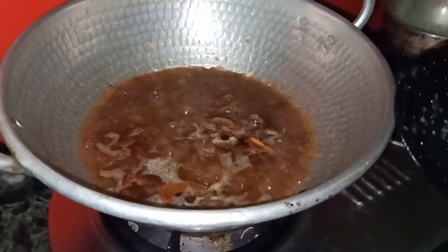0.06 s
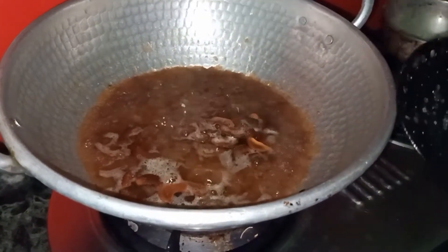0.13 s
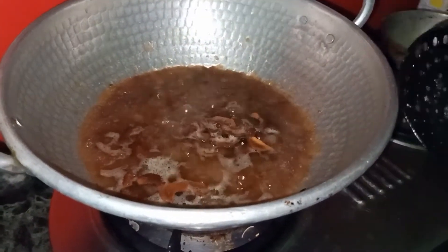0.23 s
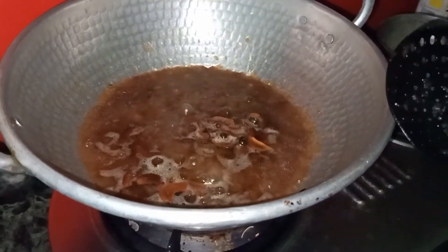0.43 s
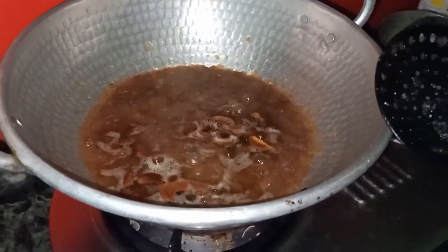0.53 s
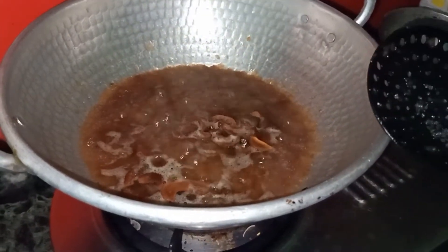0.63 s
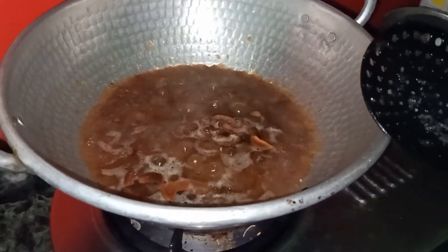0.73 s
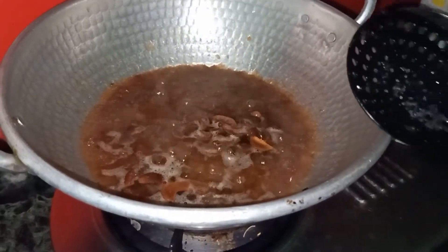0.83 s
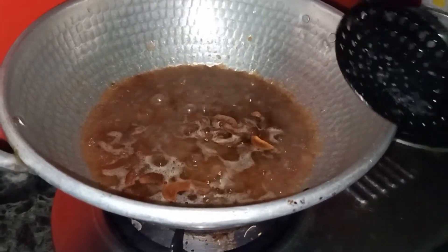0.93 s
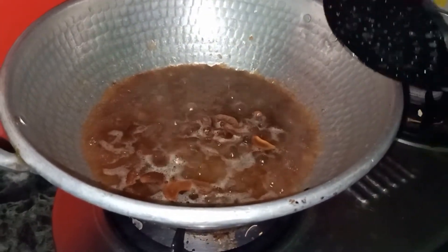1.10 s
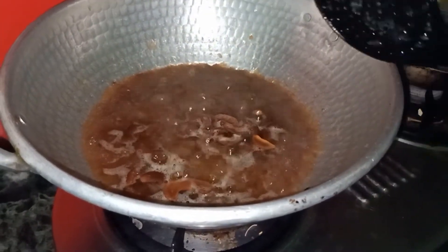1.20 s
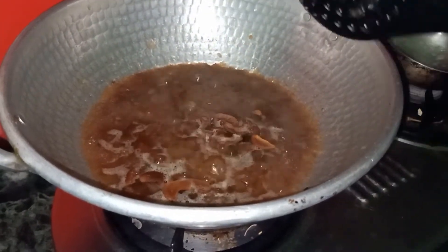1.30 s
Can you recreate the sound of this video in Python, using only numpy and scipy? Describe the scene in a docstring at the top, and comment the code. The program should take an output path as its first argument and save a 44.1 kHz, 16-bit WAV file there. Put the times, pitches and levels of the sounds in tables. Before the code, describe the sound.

A hard, clattering utensil knock rings a metal pan early on, followed by a softer muffled bump, while thick syrup sizzles and pops over a faint gas flame; close stereo microphone in a small kitchen.

```python
"""Thick syrup simmers in a metal pan on a gas ring in a small kitchen.
Its bubbles are swelling tones that start with a snap; thousands of tiny ringing bursts make the sizzle.
The flame is coloured noise. A utensil knocks the pan once, hard and clattering, and a soft bump follows:
filtered noise clanks over the ringing modes of the pan.
The two microphone ports each have a resonance of their own."""
import sys
import numpy as np
from scipy import signal
from scipy.fft import rfft, irfft
from scipy.io import wavfile

SR = 44100
rng = np.random.default_rng(int(sys.argv[2]) if len(sys.argv) > 2 else 0)


def put_to_file(sound):
    """Save the sound as 16-bit audio at rate SR, in the file named by the first command-line argument."""
    columns = np.atleast_2d(sound).T  # one column per channel
    safe = np.clip(columns, -1, 1)
    whole_steps = np.round(safe * 32767)
    wavfile.write(sys.argv[1], SR, whole_steps.astype(np.int16))


N = 59535
T = np.arange(N) / SR  # time in seconds

SIZZLE_PER_S, SIZZLE_DB = 2200, -56  # bursts per second; level before the vigour curve
SIZZLE_SPREAD_DB, SIZZLE_CAP, SIZZLE_CYCLES = 3.6, 3.8, 7  # mean excess, its cap (x spread), t60 in cycles
FLAME_DB = -53.5
BUBBLE_DB, BUBBLE_SHAPE = -2, 2.24  # level trim; exponent of the swell
BUBBLE_RISE_PER_S = 22  # pitch rise per second, as a share of the pitch
BUBBLE_PAN_DB = -3  # left minus right
SPIT_DB, SPIT_SWELL_S = 2, 0.00036
SNAP_DB, SNAP_T60_S = -14.5, 0.0048  # level relative to its bubble
WALL_S, WALL_DB = 0.014, -2  # t60 and level of the pan wall's reflections
ROOM_T60_S, ROOM_DB = 0.12, -8
CRACK_DB, CRACK_T60_S = -16.5, 0.01
CLANK_DB, CLANK_T60_S = -20, 0.1
TAIL_DB, TAIL_BUILD_S = -26.5, 0.0028
MODES_DB, RING_BUILD_S = 1, 0.00094
PORT_PHASE_PER_HZ = 0.00005  # spread of a mode's phase between the ports, in turns per Hz
BUMP_RING_SHARE = 0.91  # the bump is damped: share of the free ring time
LEFT_LAG_S = 0.00008
RUMBLE_CUT_HZ, CUTOFF_HZ = 55, 16100


def from_db(db):
    """Decibels to gain."""
    return 10 ** (np.asarray(db) / 20)


def rms_one(x):
    """Scale to rms 1."""
    return x / np.sqrt(np.mean(x ** 2) + 1e-20)


def at_hz(points, hz):
    """Read a table on a log-frequency axis."""
    f, value = np.transpose(points)
    return np.interp(np.log(hz + 1e-9), np.log(f), value)


def noise():
    """White stereo noise, alike on both sides in the bass; rms 1."""
    # Left-right likeness of diffuse sound. Each row: frequency in Hz, correlation from 0 to 1.
    likeness = [(60, 1), (250, 1), (640, 0.88), (1400, 0), (3100, 0), (7000, 0)]
    mid, side = rfft(rng.standard_normal((2, N)))
    alike = np.clip(at_hz(likeness, np.fft.rfftfreq(N, 1 / SR)), 0, 1)
    spectrum = np.sqrt(1 + alike) * mid + np.sqrt(1 - alike) * side * [[1], [-1]]
    return rms_one(irfft(spectrum, N))


def coloured(x, spectrum):
    """Causal (minimum-phase) filter that follows a spectrum; keeps the power of white noise."""
    gain = rms_one(from_db(at_hz(spectrum, np.fft.rfftfreq(2 * N, 1 / SR))))
    log_gain = np.log(np.r_[gain, gain[-2:0:-1]])
    # the Hilbert transform of the log gain gives the minimum phase
    response = np.exp(np.conj(signal.hilbert(log_gain)))[:N + 1]
    return irfft(rfft(x, 2 * N) * response)[..., :N]


def dying(t60):
    """Exponential decay by 60 dB in t60 seconds."""
    return np.exp(-np.log(1000) * T / max(t60, 1e-3))


def delayed(x, s):
    """Start a sound at time s."""
    n = int(s * SR)
    return np.pad(x, ((0, 0), (n, 0)))[:, :N]


def ring(clicks, hz, t60):
    """Two-pole resonator: a unit click sets a dying sine of starting height 1 ringing."""
    r = np.exp(-np.log(1000) / (t60 * SR))
    w = 2 * np.pi * hz / SR
    return signal.lfilter([0, np.sin(w)], [1, -2 * r * np.cos(w), r * r], clicks + 1e-18)


def sizzle(count=36):
    """Countless tiny bursts, each ringing a few cycles and reaching each port with a strength of its own."""
    # Colour of the sizzle. Each row: pitch in Hz, relative level in dB.
    colour = [(700, -3.5), (1400, 3), (2000, -1.5), (2600, 7), (3400, 5.5), (4400, -3.5), (5500, -4.5),
              (6500, -23), (8000, -45), (10000, -33), (13500, -15), (15000, -24)]
    # Vigour of the sizzle over time. Each row: time in seconds, gain in dB.
    vigour = [(0, 6), (0.18, -2), (0.4, -0.5), (0.75, -5.5), (0.92, -4.5), (1.1, -5), (1.35, 0)]
    born = rng.random(N) < SIZZLE_PER_S / SR
    strength = from_db(SIZZLE_SPREAD_DB * np.minimum(rng.exponential(1, N), SIZZLE_CAP))
    clicks = born * strength * rng.choice([-1, 1], (2, N)) * rng.uniform(0.62, 1, (2, N))
    dealt = rng.integers(0, count, N)  # which pitch each burst takes
    grains = 0
    for k, hz in enumerate(np.geomspace(800, 15000, count)):
        band = rms_one(ring(clicks * (dealt == k), hz, SIZZLE_CYCLES / hz))
        grains = grains + from_db(at_hz(colour, hz)) * band
    return from_db(np.interp(T, *np.transpose(vigour))) * from_db(SIZZLE_DB) * rms_one(grains)


def flame():
    """Gas flame and far hiss: steady noise through one fixed spectrum."""
    # Spectrum of flame and hiss. Each row: frequency in Hz, relative density in dB per Hz.
    spectrum = [(25, -3), (55, -26.5), (92, 4), (135, -8), (170, -3), (197, 10), (240, -7), (380, -0.5),
                (620, 3.5), (1400, -7), (2100, 4.5), (3600, -7.5), (5500, -8), (8000, -29.5), (14000, -30)]
    return from_db(FLAME_DB) * coloured(noise(), spectrum)


def blip(s, db, hz, swell_s):
    """A bubble opens: a tone swells, rises a little in pitch and dies."""
    t = np.maximum(T - s, 0)
    age = t / max(swell_s, 1e-4)
    swell = (age * np.exp(1 - np.minimum(age, 20))) ** BUBBLE_SHAPE * (age < 20)
    # the rising pitch passes hz at the end of the swell time
    cycles = hz * t * (1 + BUBBLE_RISE_PER_S * (t / 2 - swell_s))
    return from_db(db) * swell * np.sin(2 * np.pi * cycles)


def bubbles():
    """Larger bubbles and sharp spits; each starts with the noisy snap of its bursting film."""
    # Larger bubbles. Each row: start in seconds, peak level in dB before trim, pitch in Hz,
    # swell time in seconds.
    large = [(0.0135, -34, 2620, 0.0003), (0.048, -35.5, 2525, 0.0024), (0.056, -34, 2610, 0.00081),
             (0.0615, -40, 2550, 0.00096), (0.0635, -32.5, 2470, 0.0015), (0.0787, -37.5, 2600, 0.00092),
             (0.086, -34.5, 2440, 0.0006), (0.1324, -38, 2620, 0.00056), (0.141, -39.5, 2620, 0.0019),
             (0.1481, -28.5, 3080, 0.00059), (0.1721, -40, 2210, 0.0026), (0.182, -33.5, 2400, 0.00043),
             (0.184, -36.5, 3200, 0.0021), (0.4778, -40, 2470, 0.00096), (0.6396, -33, 2880, 0.00062),
             (0.6519, -45, 2370, 0.0033), (0.6597, -30.5, 2360, 0.0005), (0.737, -36, 2770, 0.00037),
             (0.747, -38, 2480, 0.0012), (0.7695, -41.5, 2380, 0.0014), (0.7982, -36, 2700, 0.0013),
             (0.8073, -36.5, 2550, 0.00074), (0.847, -42.5, 2500, 0.0013), (0.8846, -36, 2400, 0.00058),
             (0.9764, -37.5, 2470, 0.00099), (0.9936, -34.5, 2410, 0.00049), (0.9982, -45, 2340, 0.003),
             (1.0108, -29.5, 2430, 0.00062), (1.059, -35, 2890, 0.00076), (1.1133, -37, 2330, 0.0012),
             (1.1302, -35, 2400, 0.00085), (1.1404, -33, 2450, 0.00082), (1.2845, -41, 2590, 0.0013),
             (1.3213, -40, 2460, 0.00088)]
    # Sharp spits of tiny bubbles. Each row: start in seconds, peak level in dB before trim, pitch in Hz.
    spits = [(0.143, -48.5, 6630), (0.514, -50.5, 5900), (0.7238, -49, 5800), (0.8096, -48, 5430),
             (0.9148, -39, 3900), (1.002, -47.5, 5170), (1.011, -54, 13500), (1.015, -55.5, 10300),
             (1.014, -53, 5140), (1.085, -47, 5800), (1.131, -38, 5500), (1.2243, -41, 5200)]
    # Spectrum of a film's snap. Each row: frequency in Hz, relative density in dB per Hz.
    snap_spectrum = [(300, -15.5), (1400, 9), (2200, -16.5), (3200, 7.5), (5800, 1), (7500, -1),
                     (10000, -39), (14000, -13)]
    pops = [(s, db + BUBBLE_DB, hz, swell_s) for s, db, hz, swell_s in large]
    pops += [(s, db + SPIT_DB, hz, SPIT_SWELL_S) for s, db, hz in spits]
    fade = dying(SNAP_T60_S)[None]
    snap_envelope = sum(from_db(db + SNAP_DB) * delayed(fade, s) for s, db, _, _ in pops)
    tones = sum(blip(*pop) for pop in pops)
    return tones + coloured(snap_envelope * noise(), snap_spectrum)


def kitchen(x):
    """Dense reflections: a short burst from the pan's wall and the longer tail of the room."""
    early, late = rng.standard_normal((2, 2, N)) * (1 - np.exp(-T / 0.0025))
    wall = from_db(WALL_DB) * rms_one(early * dying(WALL_S))
    room = from_db(ROOM_DB) * rms_one(late * dying(ROOM_T60_S))
    return x + signal.fftconvolve(x, (wall + room) / np.sqrt(N), axes=1)[:, :N]


def clank():
    """Crack and dense short ring of one contact, and its tail in the room, which dies band by band."""
    # Decay of a blow in the room. Each row: band centre in Hz, t60 in seconds.
    decay = [(120, 0.68), (400, 0.65), (2300, 0.43), (5000, 0.31), (9000, 0.46)]
    hz, hiss = np.fft.rfftfreq(N, 1 / SR), rfft(noise())
    centres, t60s = np.transpose(decay)
    tail = 0
    for band, t60 in zip(np.eye(len(decay)), t60s):
        weight = at_hz(np.c_[centres, band], hz)  # a triangle around one centre
        tail = tail + irfft(hiss * weight, N) * dying(t60)
    hit = from_db(CRACK_DB) * dying(CRACK_T60_S) + from_db(CLANK_DB) * dying(CLANK_T60_S)
    return hit * noise() + from_db(TAIL_DB) * (1 - np.exp(-T / TAIL_BUILD_S)) * tail


def blow(contacts, ring_share=1):
    """A run of contacts on the pan: each clanks and feeds the modes; a soft one reaches only the low ones."""
    # Modes of the pan. Each row: frequency in Hz, level in dB before trim, free t60 in seconds,
    # left minus right in dB.
    modes = [(298, -38, .25, 0), (370, -34, .26, -1), (400, -27, .27, -2), (427, -27, .16, -2),
             (530, -25, .2, -4), (560, -24.5, .19, -4), (1066, -39, .24, 0), (1617, -36, .26, -2),
             (1973, -35, .28, -1), (2268, -32, .36, -2), (2380, -31, .32, -3), (2451, -38, .3, 2),
             (2505, -35, .3, 0), (2620, -29, .3, 0), (2822, -32, .33, 4), (2951, -35, .35, 3),
             (3044, -28, .29, 5), (3123, -32, .3, 4), (3223, -35, .22, 4), (3884, -37, .2, 2),
             (5088, -37, .27, -4), (5462, -28.5, .22, -2)]
    # Dense, short ring of each contact. Each row: frequency in Hz, relative density in dB per Hz.
    clank_spectrum = [(30, -26), (80, -18), (150, -13), (280, -7.5), (450, -4), (580, -4.5), (700, -6),
                      (1000, -2), (1400, -2), (2200, 0.5), (3300, -1), (4300, -12.5), (5400, -8.5),
                      (6300, -24), (7800, -35), (13800, -31.5), (16000, -60)]
    clanks = 0
    for s, db, _, bright in contacts:
        dull = signal.butter(4, min(bright, 0.45 * SR), fs=SR, output="sos")
        clanks = clanks + from_db(db) * delayed(signal.sosfilt(dull, clank()), s)
    out = coloured(clanks, clank_spectrum)
    for hz, level_db, t60, pan_db in modes:
        fade = (dying(t60 * ring_share) * (1 - np.exp(-T / RING_BUILD_S)))[None] ** 2
        energy = 0  # the contacts add in energy
        for s, _, ring_db, bright in contacts:
            reach = 1 / (1 + (hz / bright) ** 4)
            energy = energy + from_db(ring_db) ** 2 * reach * delayed(fade, s)
        gain = from_db(MODES_DB + level_db + np.array([[pan_db], [-pan_db]]) / 2)
        turns = rng.random() + PORT_PHASE_PER_HZ * hz * rng.standard_normal((2, 1))
        out = out + gain * np.sqrt(energy) * np.sin(2 * np.pi * (hz * T + turns))
    return out


def utensil():
    """The hard knock, then the muffled bump, whose modes ring a little shorter."""
    # Contacts of each blow. Each row: start in seconds, clank level in dB, ring level in dB,
    # brightness cutoff in Hz.
    knock = [(0.2118, -8, -2.5, 4600), (0.2145, -4, -4, 870), (0.2190, 0, -2.5, 12000),
             (0.2228, -2.5, -27.5, 12000), (0.2295, -6.5, -29, 9100), (0.2408, -13.5, -33, 9200),
             (0.279, -20, -11.5, 5900)]
    bump = [(0.5322, -9, -15, 1180), (0.5435, -26, -29.5, 5800), (0.569, -22, -15, 760),
            (0.572, -22.5, -44, 5800), (0.589, -30, -20, 1220)]
    return blow(knock) + blow(bump, BUMP_RING_SHARE)


def port(x, peaks):
    """A microphone port's resonances: a chain of peaking filters."""
    for hz, db, q in peaks:
        w, g = 2 * np.pi * hz / SR, from_db(db / 2)
        k = np.sin(w) / (2 * q)
        b = [1 + k * g, -2 * np.cos(w), 1 - k * g]
        a = [1 + k / g, -2 * np.cos(w), 1 - k / g]
        x = signal.lfilter(b, a, x)
    return x


def scene():
    """Syrup, utensil and flame; the pan is a little nearer the right port."""
    balance = from_db(np.array([[1], [-1]]) * BUBBLE_PAN_DB / 2)
    syrup = bubbles() * balance + sizzle()
    left, right = kitchen(syrup) + utensil()
    lagging_left = np.interp(T - LEFT_LAG_S, T, left)
    return flame() + np.array([lagging_left, right])


def record(dry):
    """Each port colours its side; rumble and the top are cut."""
    # Port resonances. Each row: frequency in Hz, gain in dB, Q.
    left_port = [(2550, 9.5, 3.3), (5800, 6.5, 1.28)]
    right_port = [(3200, -8, 5.4), (5720, 15.5, 2.78)]
    heard = np.array([port(dry[0], left_port), port(dry[1], right_port)])
    heard = signal.sosfilt(signal.butter(2, RUMBLE_CUT_HZ, "high", fs=SR, output="sos"), heard)
    return signal.sosfilt(signal.cheby2(14, 60, CUTOFF_HZ, fs=SR, output="sos"), heard)


dry = scene()
out = record(dry)
put_to_file(out)
```